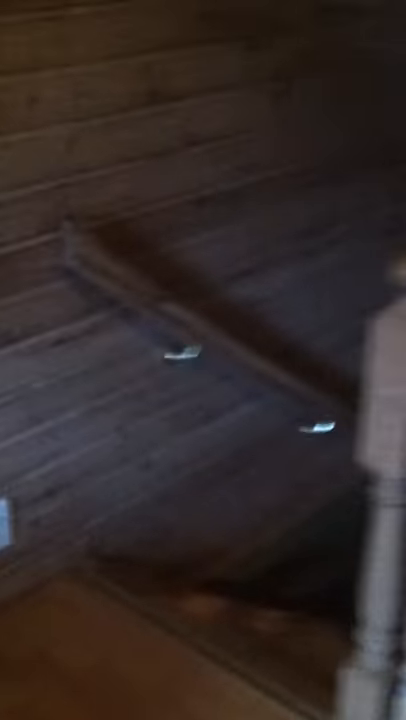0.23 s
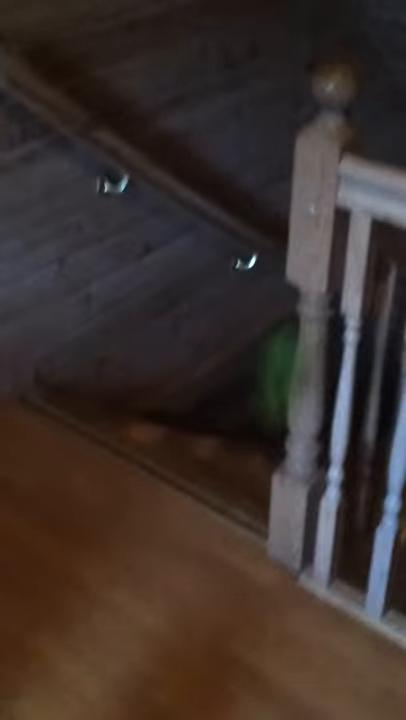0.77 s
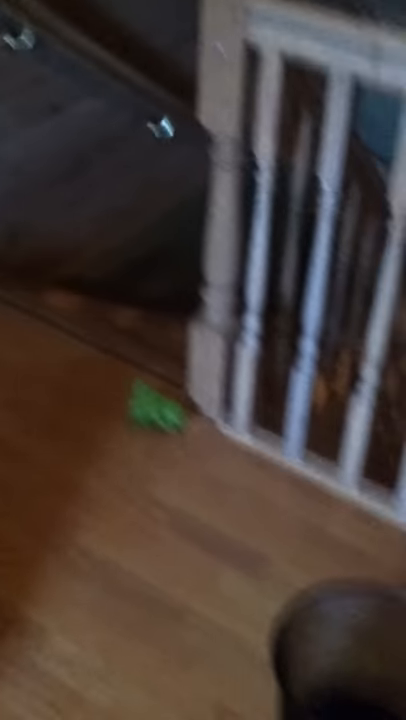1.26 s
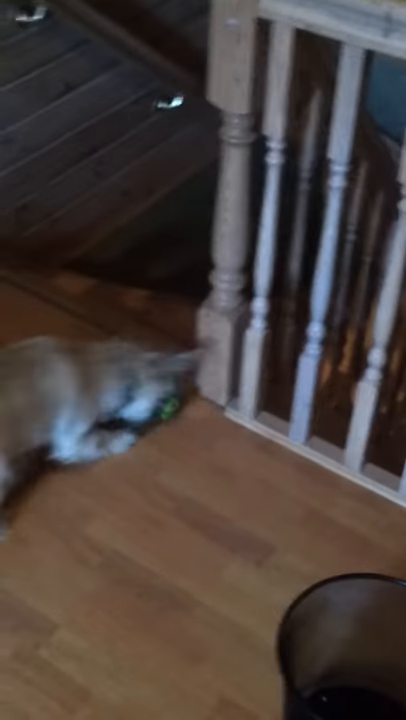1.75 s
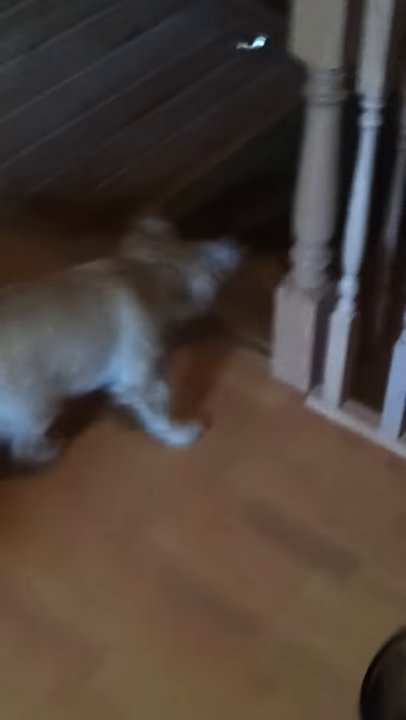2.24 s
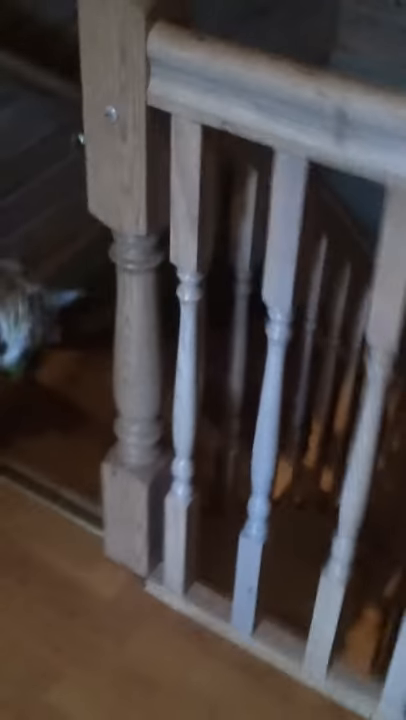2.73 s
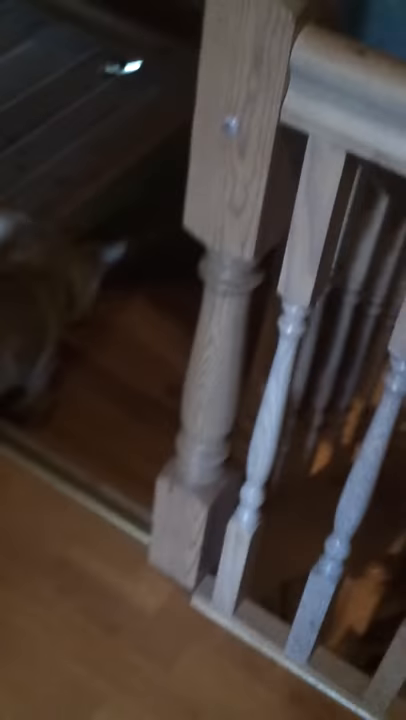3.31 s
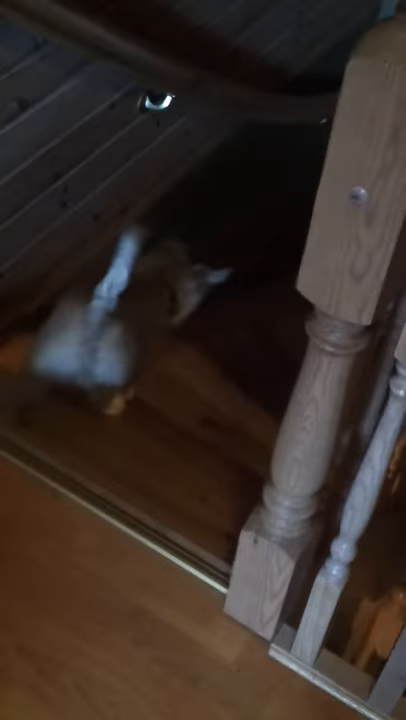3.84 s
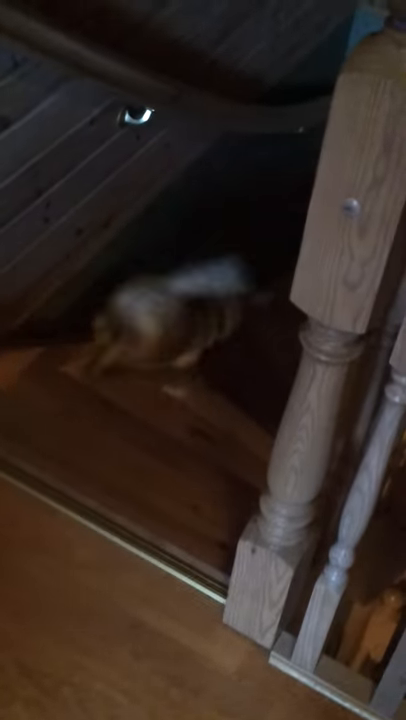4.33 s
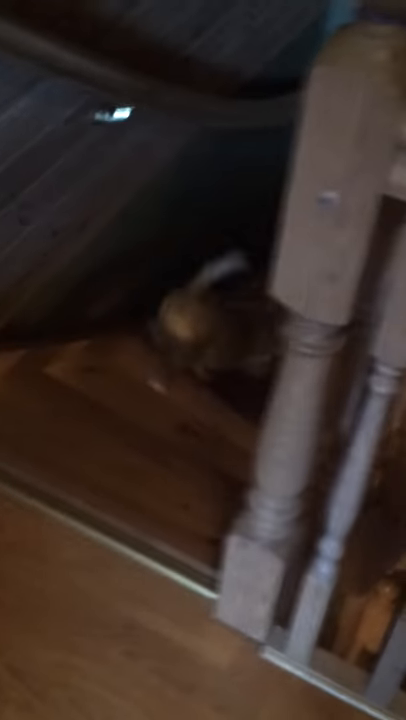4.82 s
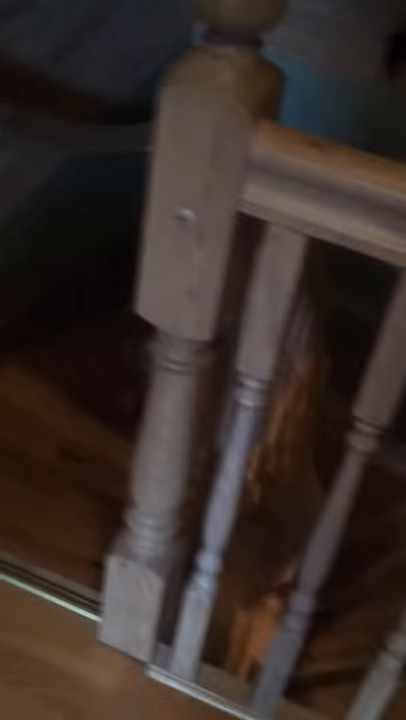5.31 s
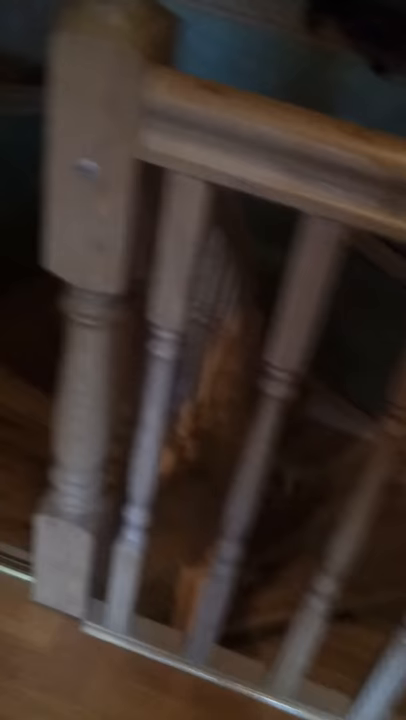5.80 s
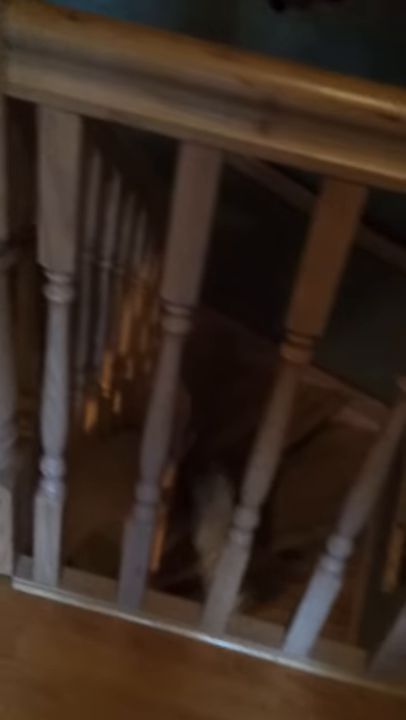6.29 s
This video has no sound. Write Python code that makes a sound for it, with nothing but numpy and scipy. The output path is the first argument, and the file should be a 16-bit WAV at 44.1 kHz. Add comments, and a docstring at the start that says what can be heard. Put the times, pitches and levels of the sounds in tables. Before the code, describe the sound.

Indoors on a wooden landing, a small dog chases a thrown toy. Its claws click, scrape and skid on the boards amid a quick cluster of loud knocks from paws and toy. Lighter, uneven ticks follow, then the dog trots down hollow wooden stairs with soft taps that ring a little longer. The stairwell adds a short echo, and a phone microphone picks up faint house rumble and hiss throughout.

```python
"""A small dog chases a thrown toy on a wooden landing, then trots down wooden stairs, heard on a phone.
Over faint house rumble and hiss, claws and toy tick and slide, ringing claw, board and floor, and the
panelled stairwell answers with a diffuse tail. From 0.5 to 1.6 s the paws skid amid the loudest knocks.
Lighter steps follow; from 3.8 s they fall on hollow treads that ring longer, a soft brush ahead of
each stride. From 5.3 s a faint low rumble swells under the last steps."""
import sys
import numpy as np
from scipy import signal
from scipy.fft import rfft, irfft
from scipy.io import wavfile
from scipy.ndimage import uniform_filter1d

SR = 44100
rng = np.random.default_rng(int(sys.argv[2]) if len(sys.argv) > 2 else 0)


def int16_out(signal):
    """Quantize to a 16-bit WAV file."""
    q = np.round(np.clip(np.atleast_2d(signal).T, -1, 1) * 32767)
    wavfile.write(sys.argv[1], SR, q.astype(np.int16))


N = 288987
FFT_SIZE, LEAD_SAMPLES = 32768, 512  # per response; silence ahead of it
BIN_HZ = np.arange(FFT_SIZE // 2 + 1) * SR / FFT_SIZE
SCENE_HZ = np.arange(N // 2 + 1) * SR / N


def amp(db):
    """dB to gain."""
    return 10 ** (np.asarray(db) / 20)


def curve_at(table, hz):
    """A (frequency [Hz], value) table read on a log-frequency axis."""
    table_hz, values = np.transpose(table)
    return np.interp(np.log(hz + 1), np.log(table_hz), values)


def unit_rms(x):
    """Each row scaled to rms 1."""
    return x / np.sqrt(np.mean(np.abs(x) ** 2, axis=-1, keepdims=True))


def resonance(hz, width_hz):
    """Causal response of one mode, gain 1 at its centre."""
    return 1j * BIN_HZ * width_hz / (hz ** 2 - BIN_HZ ** 2 + 1j * BIN_HZ * width_hz)


# Diffuse sound, left against right: (frequency [Hz], coherence [0-1])
PORT_COHERENCE = [(60, 0.85), (150, 0.6), (300, 0.54), (700, 0.53), (1500, 0.13), (14000, 0.06)]
def mic_ports(mid, side, hz):
    """Two microphone ports: alike in the bass, unrelated in the treble."""
    coherence = curve_at(PORT_COHERENCE, hz)
    common, opposed = np.sqrt(1 + coherence) * mid, np.sqrt(1 - coherence) * side
    return np.array([common + opposed, common - opposed]) / np.sqrt(2)


# House noise spectrum: (frequency [Hz], relative density [dB])
HOUSE_SPECTRUM = [(20, -37), (60, -19), (110, -7), (200, -4), (400, -7), (800, -10), (1500, -12),
                  (4000, -19.5), (9000, -21.5), (13000, -17), (14500, -14)]
def house_noise(level_db=-51.5, drift_samples=4000):
    """Faint rumble and hiss; the level wanders by about 1 dB."""
    white = rfft(rng.standard_normal((2, N)))
    spectrum = mic_ports(*white, SCENE_HZ) * amp(curve_at(HOUSE_SPECTRUM, SCENE_HZ))
    steps_db = np.repeat(rng.standard_normal(N // drift_samples + 1), drift_samples)[:N]
    drift_db = uniform_filter1d(steps_db, drift_samples)
    return unit_rms(irfft(spectrum, N)) * amp(level_db + drift_db)


# Rumble envelope: (time [s], level [dB])
RUMBLE_SWELL = [(5.3, -85), (5.6, -72.5), (6.55, -72)]
def low_rumble(band_hz=(35, 75)):
    """A dull rumble that swells near the end, the same at both ports."""
    time_s, level_db = np.transpose(RUMBLE_SWELL)
    bandpass = signal.butter(2, band_hz, "band", fs=SR, output="sos")
    noise = signal.sosfilt(bandpass, rng.standard_normal(N))
    return unit_rms(noise) * amp(np.interp(np.arange(N) / SR, time_s, level_db))


# Stairwell decay: (frequency [Hz], T60 [s])
STAIRWELL_T60 = [(200, 0.46), (700, 0.5), (2500, 0.49), (8000, 0.39)]
# Return from the panels: (frequency [Hz], gain [dB])
PANEL_RETURN = [(200, -4), (700, -5.5), (2500, -1), (8000, -11.5), (13000, -14.5)]
def stairwell(tail_db, early_boost=0.6, early_s=0.016):
    """Direct sound plus a diffuse tail, new for each spot. Spectra shaped (port, spot, bin)."""
    t = np.arange(FFT_SIZE) / SR
    noise = rng.standard_normal((len(tail_db), 2, FFT_SIZE))
    noise *= 1 + early_boost * np.exp(-t / early_s)  # nearest boards and banisters answer loudest
    tail = 0
    for band_hz, t60_s in STAIRWELL_T60:
        band = curve_at([(hz, float(hz == band_hz)) for hz, _ in STAIRWELL_T60], BIN_HZ)
        decay = amp(-60 * t / t60_s) / np.sqrt(t60_s * SR / np.log(1e6))
        tail = tail + band * rfft(noise * decay)
    diffuse = mic_ports(tail[:, 0], tail[:, 1], BIN_HZ)
    tail_gain = amp(tail_db + curve_at(PANEL_RETURN, BIN_HZ))
    left_lag_s = 70e-6 + 137e-6 * rng.standard_normal((len(tail_db), 1))
    direct = np.exp(-2j * np.pi * BIN_HZ * np.array([left_lag_s, np.zeros_like(left_lag_s)]))
    lead = np.exp(-2j * np.pi * BIN_HZ * LEAD_SAMPLES / SR)
    return lead * (direct + tail_gain * diffuse) / np.sqrt(1 + tail_gain ** 2)


def stick_slip(shape, spread_db):
    """Friction grit: dense clicks of uneven size."""
    return rng.standard_normal(shape) * amp(spread_db * np.minimum(rng.exponential(size=shape), 6))


# Skid envelope: (time [s], claw level [dB], board level [dB])
SKID_LEVELS = [(.53, -56.5, -46.5), (0.641, -26, -38.5), (.71, -63, -49.5), (0.759, -44, -26),
               (.86, -51.5, -31.5), (0.93, -20.5, -16), (1.07, -33.5, -48), (1.151, -23.5, -31.5),
               (1.25, -38, -31), (1.34, -23, -65), (1.47, -81, -36), (1.62, -56, -84)]
def skid():
    """Claws and pads slip on the varnish while the dog brakes and turns."""
    time_s, claw_db, board_db = np.transpose(SKID_LEVELS)
    t = np.arange(N) / SR
    room = stairwell(tail_db=np.full((1, 1), 8.))[:, 0]
    claw = resonance(4110, 5200) ** 2 + .5 * resonance(7340, 1910) ** 2
    board = resonance(565, 990) ** 2
    out = 0
    for level_db, body in ((claw_db, claw), (board_db, board)):
        envelope = amp(np.interp(t, time_s, level_db, left=-120, right=-120))
        grit = unit_rms(stick_slip(N, spread_db=3.)) * envelope
        response = irfft(unit_rms(body) * room, FFT_SIZE)
        out = out + signal.fftconvolve(grit[None], response, axes=1)
    return out[:, LEAD_SAMPLES:LEAD_SAMPLES + N]


def tread_brushes(contacts, stairs_s, stride_gap_s=.2, lead_s=.037):
    """A paw brushes the tread just before each stride lands: extra, soft contact rows."""
    rows = np.array(contacts)
    starts_stride = (np.diff(rows[:, 0]) > stride_gap_s) & (rows[1:, 0] > stairs_s)
    claw_db, bright_re_claw_db, knock_db, slide_s = -55, -26, -56, .015
    return [(time_s - lead_s, claw_db, bright_re_claw_db, knock_db, knock_hz, slide_s)
            for time_s, _, _, _, knock_hz, _ in rows[1:][starts_stride]]


def contact_force(slide_s, slip_s=.012, tick_decay_s=.00041):
    """Force spectra of a nail tick plus a slide; the longer the slide, the weaker the tick."""
    t = np.arange(FFT_SIZE // 4) / SR
    progress = t / slide_s
    slide = unit_rms(stick_slip(progress.shape, spread_db=-1.5) * np.sqrt(progress) * np.exp(-progress))
    tick = unit_rms(rng.standard_normal(slide.shape) * np.exp(-t / tick_decay_s))
    tick_share = np.exp(-(slide_s / slip_s) ** 2)
    return rfft(np.sqrt(tick_share) * tick + np.sqrt(1 - tick_share) * slide, FFT_SIZE)


# Joist and board modes: (frequency [Hz], width [Hz], gain [dB])
FLOOR_MODES = [(200, 37, 2.5), (245, 36, 4.5), (270, 61, 12.5), (362, 99, 3.5), (448, 440, 5)]
def floor_thud(count, scatter_db=3):
    """Each spot on the floor excites its modes differently."""
    spot_db = scatter_db * rng.standard_normal((count, len(FLOOR_MODES)))
    modes = sum(amp(gain_db + spot_db[:, k:k + 1]) * resonance(hz, width_hz)
                for k, (hz, width_hz, gain_db) in enumerate(FLOOR_MODES))
    return resonance(410, 300) * modes


def board_knock(knock_hz, on_stairs, landing_width_hz=51, tread_width_hz=24.8):
    """The struck board rings; hollow treads ring longer than the landing."""
    width_hz = np.where(on_stairs, tread_width_hz, landing_width_hz)
    return resonance(knock_hz, width_hz) + .5 * width_hz / landing_width_hz * resonance(676, 760) ** 2


# Wood and room along the dog's path: (time [s], thud re knock [dB],
# overtone re mean of claw and knock [dB], overtone [Hz], claw [Hz], tail gain before panel return [dB])
DOG_PATH = [(0, -10, -6, 1350, 4200, 11), (.3, -4.5, -4, 1154, 3900, 15), (.75, -8.5, -3, 1620, 2760, 14.5),
            (.92, -2, -4, 1300, 3260, -1.5), (1.4, -3.5, -11.5, 1490, 3950, 13),
            (1.799, -11.5, -2.5, 1390, 3320, 11.5), (2.4, -2, -4, 1460, 3450, 12.5),
            (2.62, -35, -1.5, 1430, 2290, 6.5), (2.9, -14.5, -3, 1400, 2770, 10),
            (3.3, -6, 4.5, 1200, 3210, 19), (4.0, -7.5, 5.5, 1265, 2880, 15.5),
            (4.651, -14.5, 2, 1497, 2520, 26.5), (5.5, -11.5, 2.5, 1350, 3400, 15),
            (6.0, -11, -1, 1245, 2800, 15.5), (6.5, -16, 6.5, 1270, 2540, 11)]
# Paw and toy contacts: (time [s], claw [dB], bright ring re claw [dB], knock [dB], knock [Hz], slide [s])
CONTACT_EVENTS = [(0.0019, -26, -21, -36.5, 547, 0.0042), (0.2258, -27, -7, -42.5, 702, 0.017),
                  (0.3396, -25.5, -11.5, -34.5, 557, 0.017), (0.5767, -34.5, -34, -59, 790, 0.013),
                  (0.6273, -34, 1, -33.5, 650, 0.058), (0.6909, -34, 8.5, -27, 853, 0.024),
                  (0.7214, -15, -13, -34, 785, 0.012), (0.7426, -13, -37, -16.5, 408, 0.0039),
                  (0.8785, -12, -6.5, -52, 490, 0.02), (0.9127, -9, -6, -8.5, 370, 0.0075),
                  (1.0205, -18, -26, -48, 690, 0.017), (1.0509, -20.5, -42, -33.5, 915, 0.021),
                  (1.1427, -18, -10, -41, 620, 0.013), (1.1718, -30, -17, -18.5, 662, 0.0082),
                  (1.2589, -15, -25, -41, 670, 0.0061), (1.334, -24, 2, -41, 710, 0.0068),
                  (1.441, -23.5, -6.5, -37.5, 460, 0.0064), (1.464, -34.5, -20, -32.5, 690, 0.0047),
                  (1.5092, -35.5, -8, -59, 652, 0.0047), (1.638, -37.5, -20, -28.5, 623, 0.011),
                  (1.6711, -34.5, -16, -33.5, 690, 0.015), (1.7284, -33.5, -8.5, -30, 760, 0.013),
                  (1.914, -40, -8, -39, 512, 0.0026), (1.9595, -52, -5, -43, 785, 0.0042),
                  (2.0486, -51.5, -12, -61, 547, 0.014), (2.1484, -48.5, -29, -54.5, 600, 0.0088),
                  (2.4218, -43, -12, -45, 720, 0.0092), (2.4495, -43.5, -7, -50.5, 660, 0.0039),
                  (2.5742, -42, -26, -34, 810, 0.01), (2.601, -41.5, -30, -36.5, 620, 0.0083),
                  (2.6269, -42, -26, -34.5, 506, 0.012), (2.6603, -45.5, -17, -34, 548, .006),
                  (2.785, -48, 1, -83, 620, 0.0055), (2.8796, -34, -35, -28, 493, 0.0039),
                  (2.9728, -42.5, 5.5, -43, 570, .004), (3.0066, -42.5, -9, -35.5, 687, 0.0025),
                  (3.1698, -66, 0, -45, 395, 0.011), (3.2288, -46.5, -3, -62, 466, 0.0025),
                  (3.2687, -43.5, -21, -39.5, 403, 0.0068), (3.3297, -42, -8, -49.5, 790, 0.0035),
                  (3.474, -53, -6.5, -73.5, 400, 0.0064), (3.6406, -50.5, -6, -54.5, 440, 0.014),
                  (3.721, -42, -10, -41.5, 504, 0.015), (3.731, -42.5, 0.5, -59, 650, 0.0089),
                  (3.8803, -41, -19, -37, 803, 0.012), (4.0611, -47, -7, -41.5, 439, 0.018),
                  (4.351, -48, 1, -39, 409, 0.011), (4.632, -35.5, -31, -44.5, 427, 0.0052),
                  (4.6621, -38.5, -12, -37.5, 415, 0.0043), (4.9424, -44.5, -1, -44.5, 694, 0.014),
                  (5.1963, -87, -25, -35.5, 770, 0.018), (5.2171, -40.5, -5, -46.5, 786, 0.0024),
                  (5.4997, -44.5, -4.5, -40, 310, 0.015), (5.7615, -44.5, -18, -42.5, 265, 0.018),
                  (5.7754, -42.5, -2.5, -46.5, 772, 0.0045), (6.0092, -35.5, -7, -38, 640, 0.0056),
                  (6.1896, -46.5, -18, -43, 654, 0.022), (6.239, -43.5, -2, -39, 329, 0.019),
                  (6.383, -42.5, -24, -36, 671, 0.012), (6.4389, -41.5, -5, -49, 657, .012)]
def paw_and_toy_contacts(stairs_s=3.8, claw_scatter=.08, rms_window_s=.035):
    """Every contact rings floor, board and claw, with a bright 7 kHz microphone ring."""
    rows = CONTACT_EVENTS + tread_brushes(CONTACT_EVENTS, stairs_s)
    time_s, claw_db, bright_re_claw_db, knock_db, knock_hz, slide_s = np.transpose(rows)[:, :, None]
    path_s, *path_columns = np.transpose(DOG_PATH)
    thud_rel_db, overtone_rel_db, overtone_hz, claw_hz, tail_db = (
        np.interp(time_s, path_s, column) for column in path_columns)
    claw_hz = claw_hz * np.exp(claw_scatter * rng.standard_normal(time_s.shape))
    force = contact_force(slide_s)
    thud = floor_thud(len(rows))
    knock = board_knock(knock_hz, on_stairs=time_s > stairs_s)
    overtone = resonance(overtone_hz, 300) + .27 * resonance(1993, 1260) ** 2
    claw = 1.8 * resonance(claw_hz, .67 * claw_hz) + resonance(2700, 5620) ** 3
    bright_ring = resonance(6930, 3140) ** 2
    parts = [(knock_db + thud_rel_db, thud), (knock_db, knock),
             ((claw_db + knock_db) / 2 + overtone_rel_db, overtone),
             (claw_db, claw), (claw_db + bright_re_claw_db, bright_ring)]
    drive = force * stairwell(tail_db)
    drive_power = np.mean(np.abs(drive) ** 2, axis=0)
    # level = a part's energy, tail included, as an rms over rms_window_s
    body = sum(amp(level_db) * part / np.sqrt(np.mean(drive_power * np.abs(part) ** 2, 1, keepdims=True))
               for level_db, part in parts)
    sounds = irfft(drive * body, FFT_SIZE) * np.sqrt(rms_window_s * SR)
    out = np.zeros((2, LEAD_SAMPLES + N + FFT_SIZE))
    for k, start in enumerate((time_s[:, 0] * SR).astype(int)):
        out[:, start:start + FFT_SIZE] += sounds[:, k]
    return out[:, LEAD_SAMPLES:LEAD_SAMPLES + N]


def scene():
    """Contacts and skid over house noise and low rumble."""
    return paw_and_toy_contacts() + skid() + house_noise() + low_rumble()


# Microphone port colour: (frequency [Hz], left minus right [dB])
PORT_BALANCE = [(25, -2), (100, .5), (500, -.5), (1200, 1.5), (2300, .5), (4200, 0), (7600, 8.5),
                (12000, 3)]
def record(dry, rolloff_hz=14000, clip_level=.97, cutoff_hz=14600):
    """The phone's ports differ in colour and dull the top octave; peaks clip, the top is cut."""
    colour = amp(np.outer([.5, -.5], curve_at(PORT_BALANCE, SCENE_HZ)))
    coloured = irfft(rfft(dry) * colour / (1 + (SCENE_HZ / rolloff_hz) ** 4), N)
    lowpass = signal.ellip(8, .2, 60, cutoff_hz, fs=SR, output="sos")
    return signal.sosfilt(lowpass, np.clip(coloured, -clip_level, clip_level))


dry = scene()
out = record(dry)
int16_out(out)
```